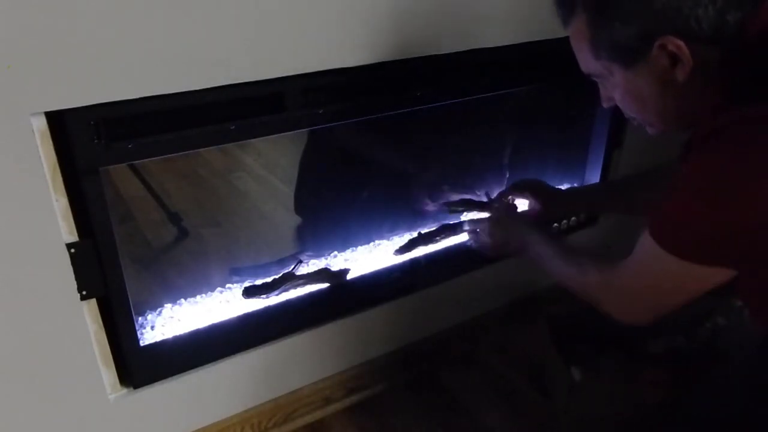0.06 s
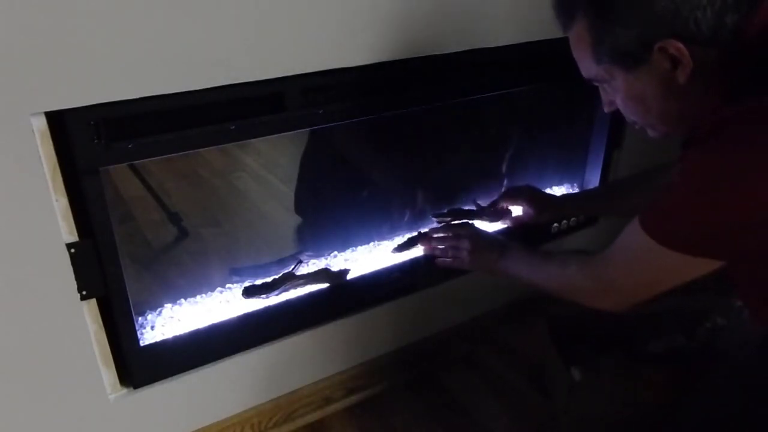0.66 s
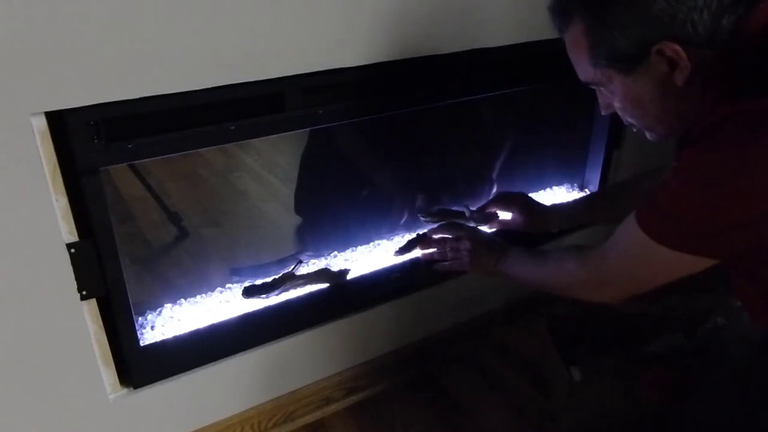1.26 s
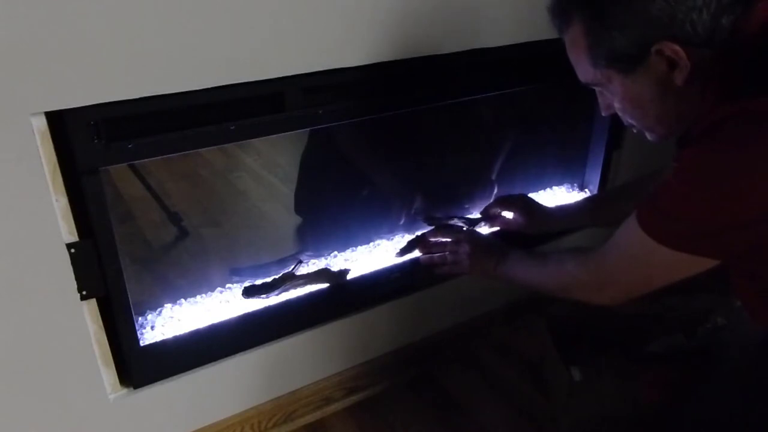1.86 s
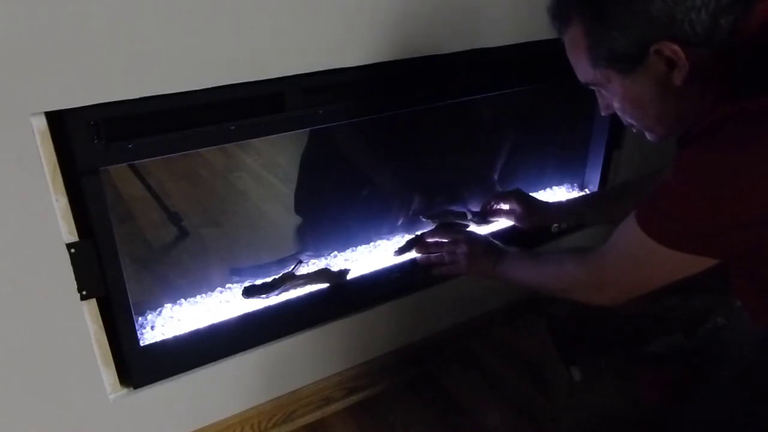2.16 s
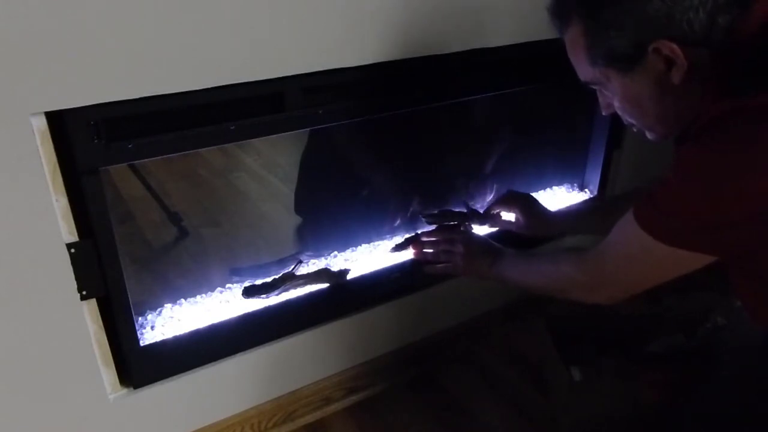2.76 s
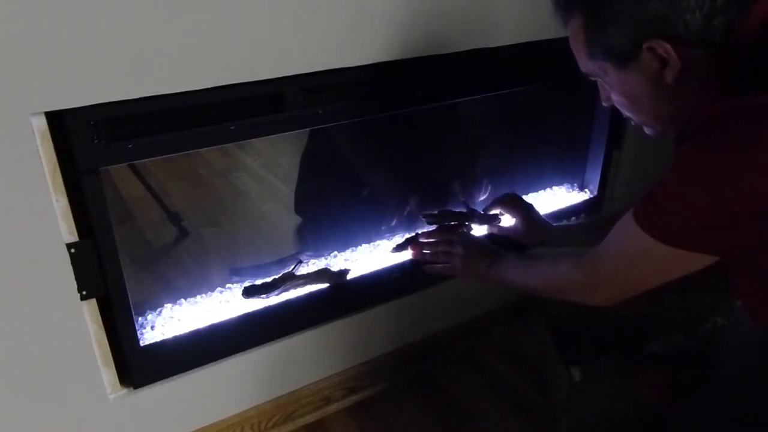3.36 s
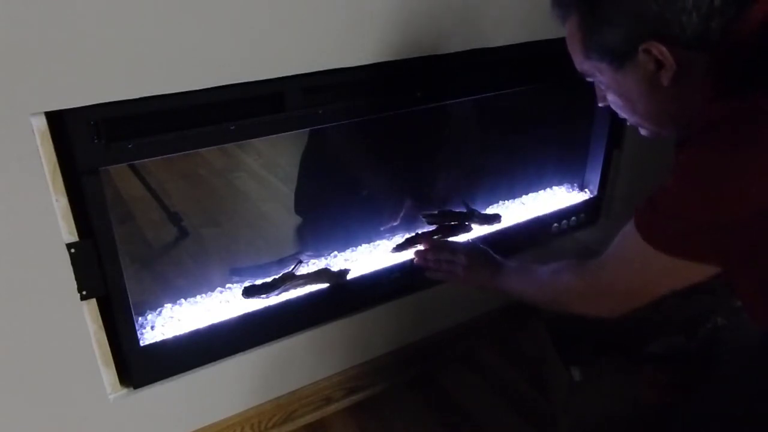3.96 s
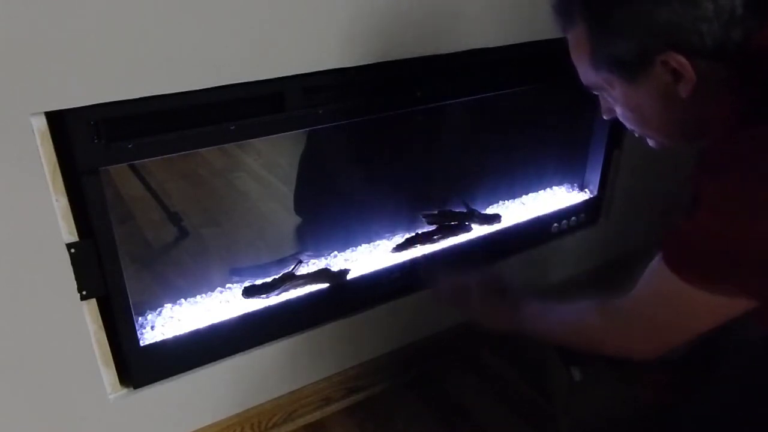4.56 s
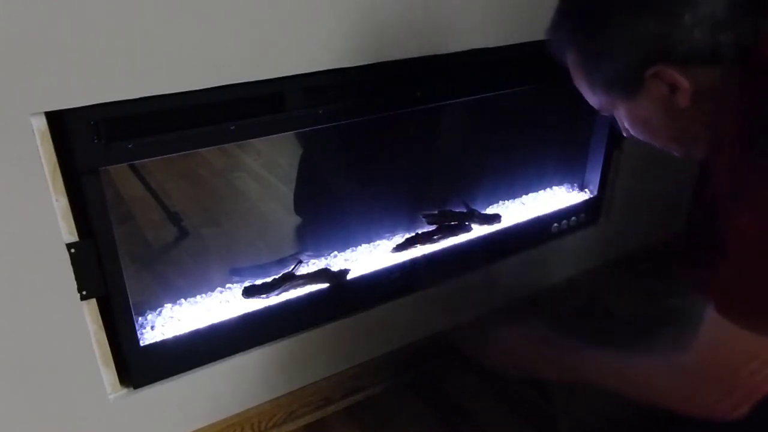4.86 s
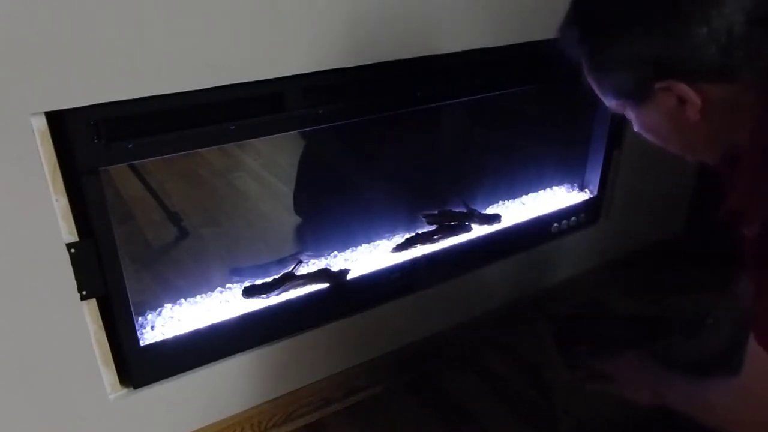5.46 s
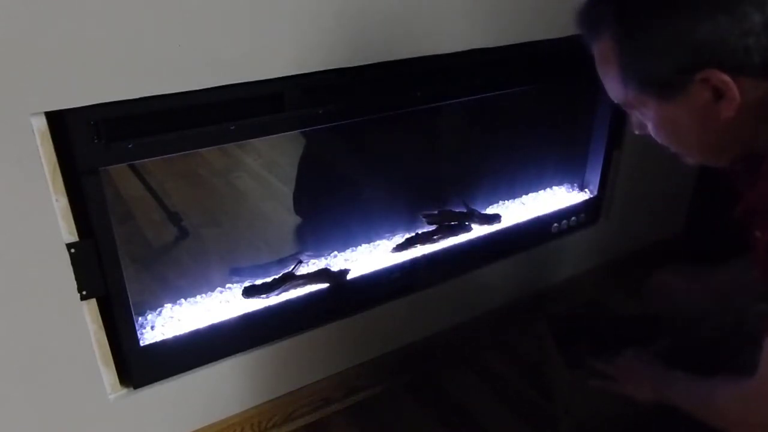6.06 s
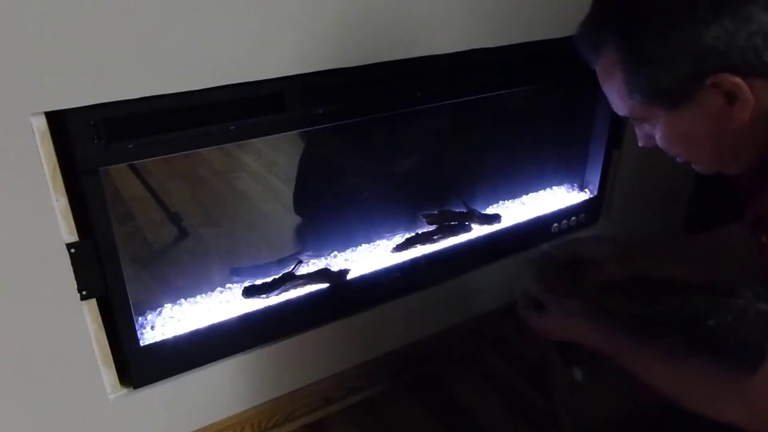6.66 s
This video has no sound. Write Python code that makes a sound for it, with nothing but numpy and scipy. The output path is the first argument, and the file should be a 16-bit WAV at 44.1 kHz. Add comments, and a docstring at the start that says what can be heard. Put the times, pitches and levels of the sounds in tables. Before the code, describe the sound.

Small decorative logs are set down and nudged over loose crystal stones in a wall fireplace. The stones click, rattle and grind in irregular clusters, while the logs knock dully on the metal tray beneath, which rings briefly. After a pause, a person shifts back over the floor with soft scuffs, rustling clothes and light bumps. It is heard from nearby in a bare, slightly echoing room.

```python
"""Loose crystal stones click and grind as hands set small decorative logs on them and nudge them about.
Each click is a spray of tiny collisions with a short ring. The logs knock the sheet-metal tray under
the stones, and the wall fireplace and the bare room echo. Then the person shifts back over the floor:
legs scuff, clothes rustle and snap, and weight lands softly. The air in the room murmurs throughout."""
import sys
import numpy as np
from scipy import signal
from scipy.fft import rfft, irfft, next_fast_len
from scipy.io import wavfile
from scipy.ndimage import uniform_filter1d

SR = 44100
rng = np.random.default_rng(int(sys.argv[2]) if len(sys.argv) > 2 else 0)


def master(y):
    """Save y as 16-bit WAV."""
    cut = np.clip(np.atleast_2d(y).T, -1, 1)
    pcm = np.round(cut * 32767)  # scale
    wavfile.write(sys.argv[1], SR, pcm.astype(np.int16))


N = 295470

# The tone of each sound, from bass to treble: frequency_hz, gain_db
AIR_TONE = [(12, -47.5), (20, -21.5), (122, -16.5), (140, -5.5), (175, -11.5), (213, -4.5), (245, -8),
            (306, -2), (452, -13.5), (565, -12), (958, -20.5), (1100, -16.5), (1580, -24.5), (10200, -26),
            (15500, -35)]
SNAP_TONE = [(60, -35), (300, -23), (1000, 3), (2200, -5), (3500, -7.5), (5000, -3), (9000, -10.5),
             (15000, -14.5)]  # a fold of cloth snapping
THUD_TONE = [(40, -51.5), (100, -18), (160, -1), (240, 2.5), (400, -4.5), (800, -1.5), (1500, -8.5),
             (5000, -33.5)]  # weight landing on the floor
SCUFF_TONE = [(60, -52), (140, -10), (195, -7), (236, 10.5), (290, 0.5), (390, -1), (480, 3), (590, -3.5),
              (700, 4), (880, 2), (1050, -13.5), (1500, -11.5), (2500, -41), (6000, -35.5)]
SCRAPE_TONE = [(400, -13), (1100, 6.5), (1700, 1.5), (2500, -6.5), (3500, -6), (5000, -11.5),
               (10000, -44.5)]
CLOTH_TONE = [(800, -12.5), (2500, -2), (3200, 3), (3650, -1), (4150, 4.5), (5200, 3), (7000, -0.5),
              (11000, -4), (15000, -15)]
RUB_TONE = [(25, -57), (70, -36), (130, -32.5), (200, 0), (300, -3), (440, 1.5), (560, -8.5), (750, -17.5),
            (1100, -5.5), (2500, -14.5), (6000, -33), (15000, -80)]  # a log dragged over the stones
BLOW_TONE = [(25, -85.5), (70, -59.5), (130, -35), (220, -21), (320, -2), (450, 2), (700, -1.5), (1000, -4),
             (1500, -8), (3000, -50), (8000, -82.5), (15000, -91.5)]  # a blow on the tray
STONE_TONE = [(30, -65), (120, -16.5), (280, 3), (450, -4), (800, 3), (1200, 0.5), (1900, 1), (3000, -1.5),
              (3900, -6.5), (5100, -6.5), (6600, -13.5), (10000, -22.5), (15000, -38)]
GRIT_TONE = [(450, -20.5), (1200, 17.5), (4500, -1.5), (9000, 1.0)]  # goes on top of STONE_TONE
# How much left and right differ, for the air and the room's echo: frequency_hz, side_db
AIR_WIDTH = [(60, 0), (150, -12), (380, -5.5), (950, 10), (2380, 4.5), (5980, -1), (15000, -8)]
ROOM_WIDTH = [(120, -25.5), (300, -42), (600, -15), (1200, -8), (5000, -9.5), (8000, -15), (12000, -7)]
# How long the room's echo takes to fall by 60 dB: frequency_hz, fade_s
ROOM_FADE = [(130, 0.3), (400, 0.69), (1000, 0.57), (2800, 0.51), (6000, 0.42), (13000, 0.32)]
# Echoes between the fireplace panels: delay_s, gain
PANEL_ECHOES = [(.0065, 0.68), (0.011, 0.55), (.0172, .27), (.0235, 0.15)]
# Cloth snaps and floor bumps: start_s, snap_db, bump_db, snap_pitch_hz, ring_db, thud_pitch_hz
SNAPS_AND_BUMPS = [(4.021, -48, -35.5, 2950, -12, 230), (4.713, -31, -63, 4450, 13, 500),
                   (5.061, -26, -18, 1087, -19, 710), (5.1039, -25.5, -23.5, 2770, -1, 710),
                   (5.146, -28.5, -50.5, 6500, -1, 700), (5.1992, -22.5, -36.5, 4790, -4.5, 600),
                   (5.205, -21, -43.5, 10330, -11, 600), (5.449, -34, -28, 5510, -21, 256),
                   (5.46, -26, -51, 3140, -8, 600), (5.47, -28.5, -36.5, 3100, -9.5, 600),
                   (5.581, -31, -24, 1520, 0, 600), (5.606, -21.5, -40.5, 1705, -1, 242),
                   (5.804, -28.5, -29.5, 7400, -7, 240), (5.831, -21, -21.5, 1172, -8, 695),
                   (5.8751, -18.5, -37, 3320, -11, 700), (5.943, -23, -32.5, 1950, 9, 236),
                   (6.0734, -18.5, -29.5, 2660, -10, 800), (6.114, -22, -34, 2480, -8, 900),
                   (6.154, -27, -22.5, 1730, -6, 746), (6.2212, -13, -29.5, 2270, 5, 810)]
# Moves of the legs and body: start_s, length_s, scuff_db, cloth_db
BODY_MOVES = [(4.55, 0.072, -53, -48), (4.68, 0.13, -45.5, -49), (4.815, 0.13, -45, -46.5),
              (4.98, 0.081, -47, -53), (5.046, 0.15, -30, -46.5), (5.32, 0.081, -37.5, -49.5),
              (5.49, 0.035, -44, -48), (5.525, 0.08, -34, -42), (5.645, 0.045, -35.5, -45.5),
              (5.757, 0.026, -35, -41), (5.8, 0.059, -31, -44), (5.885, 0.077, -34, -45),
              (6.03, 0.14, -41, -44.5), (6.085, 0.1, -39.5, -38.5), (6.27, 0.051, -58, -41.5)]
# Hands push a log over the stones: start_s, length_s, grit_db, rub_db
LOG_PUSHES = [(0.46, 0.11, -35, -35.5), (0.65, 0.14, -29.5, -36), (0.94, 0.033, -42, -44),
              (1.26, 0.28, -43, -36.5), (1.67, 0.045, -42, -50), (1.8, 0.03, -40, -54),
              (2.04, 0.098, -44, -32), (2.44, 0.11, -31, -44), (2.6, 0.063, -56.5, -31.5),
              (2.89, 0.18, -72, -50)]
# The notes the metal tray rings with: pitch_hz, level_db, fade_s
TRAY_NOTES = [(127.1, -10, 0.6), (398.7, 4.5, 0.34), (437.4, 4.5, 0.4), (500, 0, 0.4), (558, 4, 0.27),
              (629.6, 5.5, 0.11), (699, 0.5, 0.53), (828.7, 10.5, 0.14), (963, 1, 0.26), (1069, 2, 0.23),
              (1197, -2, 0.25)]
# A hand weighs on the tray, so it rings lower: start_s, end_s, share_of_pitch_lost
HAND_LEANS = [(0.5, 1.0, 0.012), (1.9, 2.3, 0.039)]
# Logs landing and rocking: start_s, level_db, pitch_hz, ring_db
LOG_KNOCKS = [(0.413, -15.5, 760, -19.5), (0.608, -11.5, 780, -20), (0.617, -16, 795, -23),
              (0.66, -25, 650, -18), (0.702, -26.5, 600, -14.5), (0.793, -25.5, 670, -17.5),
              (0.913, -22.5, 764, -21), (1.117, -24, 700, -17), (1.174, -20.5, 680, -21),
              (1.334, -29.5, 700, -12), (1.552, -35, 760, -14), (1.935, -36, 706, -13.5),
              (1.979, -25.5, 790, -17.5), (2.034, -30, 700, -11.5), (2.054, -27.5, 623, -16),
              (2.073, -20.5, 610, -14.5), (2.351, -39, 650, -4), (2.431, -23.5, 850, -22.5),
              (2.496, -23, 840, -19), (2.559, -21.5, 600, -15), (2.586, -9, 690, -21.5),
              (2.602, -15.5, 700, -26), (2.636, -23.5, 610, -20), (2.649, -18.5, 675, -34),
              (2.656, -19, 600, -23), (3.137, -39, 694, -13.5)]
# Typical ring pitch for each size of stone
LARGE_HZ, MEDIUM_HZ, SMALL_HZ, CHIP_HZ, SPLINTER_HZ = 1660, 2040, 2490, 3035, 4930
# Stones hitting each other: start_s, level_db, bass_db, treble_db, crunch_s, pitch_hz, ring_db
STONE_CLICKS = [(0.396, -39.5, 11.5, -10, 0.18, LARGE_HZ, -8),
                (0.413, -23.5, 6, -1.5, 0.0017, SPLINTER_HZ, -16),
                (0.485, -31.5, 7.5, -33.5, 0.012, LARGE_HZ, -2.5),
                (0.524, -45, 4, 5.5, 0.0073, SPLINTER_HZ, -19.5),
                (0.569, -37.5, 1.5, -25, 0.0056, CHIP_HZ, -7),
                (0.6084, -25, 8, -5.5, 0.0038, CHIP_HZ, -9.5), (0.661, -38, 7, -13, 0.01, LARGE_HZ, -5),
                (0.699, -37, 0, -31, 0.013, MEDIUM_HZ, -7), (0.732, -38, 10, -1, 0.0084, MEDIUM_HZ, -17),
                (0.778, -35, -3.5, -7.5, 0.017, SMALL_HZ, -8),
                (0.9015, -33, -20.5, -1, 0.0023, MEDIUM_HZ, -11),
                (0.913, -31, 9.5, -26, 0.003, LARGE_HZ, -8.5),
                (0.98, -40.5, -23, -16, 0.0046, SMALL_HZ, -1.5),
                (1.117, -28, -9, -14.5, 0.0055, MEDIUM_HZ, -3.5),
                (1.173, -16.5, -5.5, -1, 0.01, LARGE_HZ, -3.5),
                (1.186, -17.5, 5, 2.5, 0.0078, LARGE_HZ, -30.5),
                (1.194, -21.5, -0.5, -4, 0.022, MEDIUM_HZ, -19.5),
                (1.333, -31, 2, -19, 0.0066, MEDIUM_HZ, -2), (1.353, -34.5, 2, -9, 0.0071, MEDIUM_HZ, -6),
                (1.379, -44, 0, 1, 0.011, SPLINTER_HZ, -22.5),
                (1.408, -31.5, -5.5, -8.5, 0.0093, LARGE_HZ, -7),
                (1.42, -28.5, 7, -4, 0.0053, SMALL_HZ, -7.5),
                (1.434, -50, 3.5, -8.5, 0.0054, MEDIUM_HZ, -6.5),
                (1.451, -29.5, -30, -2.5, 0.015, MEDIUM_HZ, -20),
                (1.616, -24, 0, -4.5, 0.007, MEDIUM_HZ, -12.5),
                (1.621, -27.5, -6.5, -5.5, 0.013, LARGE_HZ, -34),
                (1.663, -31.5, 2.5, -2.5, 0.0078, SPLINTER_HZ, -1),
                (1.679, -36, 5, -11, 0.0057, MEDIUM_HZ, -5), (1.696, -32, 7, -9, 0.0073, MEDIUM_HZ, -2),
                (1.744, -32, 4, -16, 0.013, SMALL_HZ, -11.5),
                (1.755, -28.5, -0.5, -5.5, 0.014, SMALL_HZ, -21),
                (1.783, -27.5, 4.5, -10, 0.011, MEDIUM_HZ, -11),
                (1.974, -40, 19, -39, 0.021, LARGE_HZ, 7.5), (2.054, -32.5, -7, -9, 0.025, SMALL_HZ, -8.5),
                (2.076, -30, 6, -2.5, 0.01, LARGE_HZ, -4.5),
                (2.253, -42.5, -10.5, -12.5, 0.0039, MEDIUM_HZ, -3),
                (2.336, -36, 0, -4, 0.0024, SMALL_HZ, -7), (2.3498, -19.5, 2.5, -5, 0.0051, MEDIUM_HZ, -38),
                (2.355, -22.5, -16, 2.5, 0.0072, SPLINTER_HZ, -12),
                (2.426, -28, -2.5, 2.5, 0.006, SPLINTER_HZ, -7),
                (2.432, -29, 3, -3, 0.0052, SPLINTER_HZ, -23),
                (2.471, -40, 13, -4, 0.0041, SPLINTER_HZ, -4.5), (2.491, -31, 4, -2, 0.008, CHIP_HZ, -7.5),
                (2.51, -29.5, -2.5, -5.5, 0.0097, SPLINTER_HZ, -8.5),
                (2.545, -37.5, 14.5, -18, 0.011, SMALL_HZ, -5),
                (2.558, -26.5, -7.5, -4, 0.021, SMALL_HZ, -29),
                (2.585, -24.5, 11, -26.5, 0.0077, CHIP_HZ, -12.5),
                (2.908, -47.5, -22, -1, 0.0055, MEDIUM_HZ, -8),
                (3.004, -38.5, -9, -6, 0.0028, SMALL_HZ, -2),
                (3.062, -47, 15, -13.5, 0.02, MEDIUM_HZ, -1.5), (3.111, -35, -13, -7, 0.012, SMALL_HZ, -3),
                (3.136, -26.5, -5, 3.5, 0.0044, SPLINTER_HZ, -14)]


def amp(db):
    """Turn decibels into a gain."""
    return 10 ** (np.asarray(db) / 20)


def unit(x):
    """Scale x to an average strength (rms) of 1."""
    return x / np.sqrt(np.mean(x ** 2) + 1e-20)


def punch(x):
    """Scale a hit so that its loudest 3 ms have a strength of 1."""
    return x / np.sqrt(uniform_filter1d(x * x, SR // 333).max() + 1e-20)


def along(points, hz):
    """Read between a table's rows on a log frequency scale."""
    known_hz, values = np.transpose(points)
    return np.interp(np.log(hz + 1), np.log(known_hz + 1), values)


def add(out, start_s, sound):
    """Mix a sound in at its start time."""
    part = out[..., max(round(start_s * SR), 0):][..., :sound.shape[-1]]
    part += sound[..., :part.shape[-1]]


def coloured(x, tone):
    """Filter x so that it takes on the given tone."""
    n = x.shape[-1]
    size = 2 * next_fast_len(n // 2 + SR // 16)
    gains = amp(along(tone, np.fft.rfftfreq(size, 1 / SR)))
    cepstrum = irfft(np.log(gains))
    cepstrum[1:size // 2] *= 2  # folded so that nothing sounds ahead of a hit
    cepstrum[size // 2 + 1:] = 0
    return irfft(rfft(x, size) * np.exp(rfft(cepstrum)))[..., :n]


def ringing(x, hz, q):
    """Make a hit ring at one pitch; a higher q rings longer."""
    return punch(signal.lfilter(*signal.iirpeak(hz, q, SR), x))


def grains(per_s, spread_db):
    """Rubbing is made of tiny random ticks of many sizes."""
    chance, size = rng.random(N), rng.standard_normal(N)
    direction = np.sign(rng.standard_normal(N))
    return unit((chance < per_s / SR) * direction * amp(spread_db * np.clip(size, -2, 2)))


def patchy(x, depth_db):
    """The points of contact keep changing, so the tone drifts in patches."""
    spectrum = signal.stft(x, nperseg=512)[2]
    patches = uniform_filter1d(rng.standard_normal(spectrum.shape), size=7, axis=0)
    patches = unit(uniform_filter1d(patches, size=7, axis=1))
    return unit(signal.istft(spectrum * amp(depth_db * patches), nperseg=512)[1][:N])


def strokes(rows, rise_s, sag_db_per_s, fade_s):
    """One loudness curve per level column: each stroke rises, sags and dies away."""
    t, gains = np.arange(N) / SR, 0
    for start_s, length_s, *levels_db in rows:
        age = np.maximum(t - start_s, 0)
        fade_db = sag_db_per_s * age + 60 * np.maximum(age - length_s, 0) / fade_s
        gains = gains + np.outer(amp(levels_db), np.minimum(age / rise_s, 1) * amp(-fade_db))
    return gains


def stereo(pair, width):
    """Left and right share the first signal; the second sets them apart."""
    side = coloured(pair[1], width)
    return np.array([pair[0] + side, pair[0] - side])


def in_room(x, echo_db):
    """The bare room adds a wash of echoes that lasts longest in the middle pitches."""
    hz, t, noise = signal.stft(rng.standard_normal((2, SR * 2 // 3)), SR, nperseg=256)
    far_wall = 0.14 * np.exp(-((t - .078) / 0.024) ** 2)  # a soft, late return
    swell = 1 - np.exp(-t / 0.00093) + far_wall
    fade = amp(-60 * t / along(ROOM_FADE, hz)[:, None])
    tail = signal.istft(noise * swell * fade, SR, nperseg=256)[1]
    answer = amp(echo_db) * stereo(tail / np.linalg.norm(tail[0]), ROOM_WIDTH)
    answer[:, 0] += 1  # the direct sound
    return signal.fftconvolve(x[None], answer, axes=1)


def in_firebox(x, strength):
    """The fireplace panels throw back a few quick echoes."""
    out = x.copy()
    for delay_s, gain in PANEL_ECHOES:
        add(out, delay_s, strength * gain * x)
    return out


def room_air(level_db):
    """The air in the room makes a steady low murmur with a thin hiss."""
    murmur = coloured(rng.standard_normal((2, N)), AIR_TONE)
    return amp(level_db) * unit(stereo(murmur, AIR_WIDTH))


def snaps_and_bumps(snap_gain_db, bump_gain_db):
    """Folds of cloth snap with a brief tick, and weight lands softly on the floor."""
    out, t = np.zeros((2, N)), np.arange(SR // 10) / SR
    burst = (1 - np.exp(-t / 0.00072)) * amp(-60 * t / 0.034)
    for start_s, snap_db, bump_db, snap_hz, ring_db, thud_hz in SNAPS_AND_BUMPS:
        snap = punch(coloured(rng.standard_normal(len(t)) * burst, SNAP_TONE))
        tick = punch(snap + amp(ring_db) * ringing(snap, snap_hz, q=3.3))
        thud = punch(coloured(rng.standard_normal(len(t)) * amp(-60 * t / 0.055), THUD_TONE))
        bump = punch(.5 * thud + ringing(thud, thud_hz, q=2.1))
        both = amp(snap_db + snap_gain_db) * tick + amp(bump_db + bump_gain_db) * bump
        add(out, start_s, in_room(both, echo_db=-4.5))
    return out


def shuffling(scuff_gain_db, scrape_gain_db, cloth_gain_db):
    """Legs scuff the floor and cloth rubs on cloth; harder moves scrape much more."""
    scuff, cloth = strokes(BODY_MOVES, rise_s=0.02, sag_db_per_s=42, fade_s=0.052)
    effort = np.sqrt(scuff * cloth) / amp(-37)  # 1 is a firm move
    scrape = effort ** 1.64
    low = patchy(coloured(grains(per_s=350, spread_db=5), SCUFF_TONE), depth_db=2)
    middle = patchy(coloured(grains(per_s=500, spread_db=5), SCRAPE_TONE), depth_db=3)
    high = patchy(coloured(grains(per_s=800, spread_db=6), CLOTH_TONE), depth_db=2.8)
    rustle = amp(scuff_gain_db) * scuff * low + amp(scrape_gain_db) * scrape * middle
    rustle += amp(cloth_gain_db) * cloth * high
    return in_room(rustle, echo_db=1.5)[:, :N]


def tray_knock(pitch_hz, ring_db, tuning):
    """A dull clonk echoes in the fireplace; the tray rings on, unevenly damped by the stones."""
    t = np.arange(SR // 2) / SR
    blow = punch(coloured(signal.unit_impulse(len(t)), BLOW_TONE))
    clonk_hz = pitch_hz * amp(0.3 * rng.standard_normal())
    clonk = punch(0.5 * blow + ringing(blow, clonk_hz, q=2.3))
    hz, level_db, fade_s = np.transpose(TRAY_NOTES)[:, :, None]
    level_shift, phase = rng.standard_normal((2, len(hz), 1))
    drift = np.cumsum(rng.standard_normal((len(hz), len(t))), axis=1) * np.sqrt(hz / SR) * .2
    fade = amp(level_db + 1.2 * level_shift - 60 * t / fade_s)
    notes = fade * np.sin(2 * np.pi * tuning * hz * t + np.pi * phase + drift)
    swell = (1 - np.exp(-t * hz / 0.95)) ** 2  # each note builds over a few cycles
    return in_firebox(clonk, strength=0.66) + amp(ring_db) * (notes * swell).sum(0)


def grinding(grit_gain_db, rub_gain_db):
    """While a log slides, stones tick together and its dull rubbing keeps the tray humming."""
    grit, rub = strokes(LOG_PUSHES, rise_s=0.01, sag_db_per_s=8.5, fade_s=0.14)
    collisions = coloured(grains(per_s=130, spread_db=4), STONE_TONE)
    ticks = patchy(coloured(collisions, GRIT_TONE), depth_db=5)
    judder = grains(per_s=590, spread_db=6.5)
    hum = unit(signal.fftconvolve(judder, tray_knock(pitch_hz=662, ring_db=-7, tuning=1.0))[:N])
    drag = unit(unit(coloured(judder, RUB_TONE)) + amp(-7.5) * hum)
    slide = amp(grit_gain_db) * grit * ticks + amp(rub_gain_db) * rub * drag
    return in_room(slide, echo_db=-1.0)[:, :N]


def logs():
    """A log's weight goes through the stones into the tray; where it lands sets pitch and ring."""
    out = np.zeros((2, N))
    for start_s, level_db, pitch_hz, ring_db in LOG_KNOCKS:
        tuning = 1 - sum(lost for begin, end, lost in HAND_LEANS if begin < start_s < end)
        knock = tray_knock(pitch_hz, ring_db, tuning)
        add(out, start_s, amp(level_db) * in_room(knock, echo_db=-11.5))
    return out


def stone_click(crunch_s, pitch_hz, ring_db, bass_db, treble_db):
    """A quick spray of tiny collisions makes the struck stone ring briefly."""
    t = np.arange(SR // 16) / SR
    jostle = rng.standard_normal(len(t)) * amp(4.9 * np.clip(rng.standard_normal(len(t)), -2, 2))
    clumps = amp(4 * np.interp(t, np.arange(64) / 900, rng.standard_normal(64)))
    settling = .08 * amp(-60 * t / .13)
    rise = 1 - np.exp(-t / .0007)
    spray = rise * (np.exp(-(t / crunch_s) ** 2) + settling)
    crack = punch(coloured(jostle * clumps * spray, STONE_TONE))
    ring_hz = pitch_hz * amp(0.23 * rng.standard_normal())
    click = punch(crack + amp(ring_db) * ringing(crack, ring_hz, q=10))
    return coloured(click, [(130, bass_db - 3.5), (450, bass_db), (1200, 0), (5200, 0.0064),
                            (7200, 0.68 * treble_db + 3.0), (9500, treble_db)])


def stones(gain_db):
    """Stones hit each other; every click echoes in the fireplace and then in the room."""
    out = np.zeros((2, N))
    for start_s, level_db, bass_db, treble_db, crunch_s, pitch_hz, ring_db in STONE_CLICKS:
        click = stone_click(crunch_s, pitch_hz, ring_db, bass_db, treble_db)
        echoed = in_room(in_firebox(click, strength=0.22), echo_db=-5.5)
        add(out, start_s, amp(level_db + gain_db) * echoed)
    return out


def scene():
    """Mix the fireplace, the person and the air in the room."""
    fireplace = stones(gain_db=2.5) + logs() + grinding(grit_gain_db=-8.0, rub_gain_db=-7.0)
    person = shuffling(scuff_gain_db=-7.0, scrape_gain_db=-41.5, cloth_gain_db=-5.0)
    person += snaps_and_bumps(snap_gain_db=-12.0, bump_gain_db=-7.0)
    slightly_right = amp([[-.3], [.3]])
    return fireplace + person * slightly_right + room_air(level_db=-54)


def record(dry):
    """Cut off the very highest treble."""
    top_hz = 15600
    size = next_fast_len(N + SR // 4)
    kept = np.fft.rfftfreq(size, 1 / SR) < top_hz
    return irfft(rfft(dry, size) * kept, size)[:, :N]


dry = scene()
out = record(dry)
master(out)
```